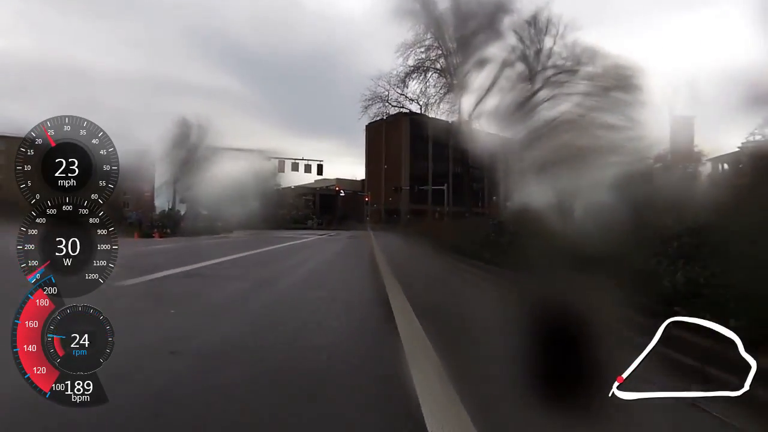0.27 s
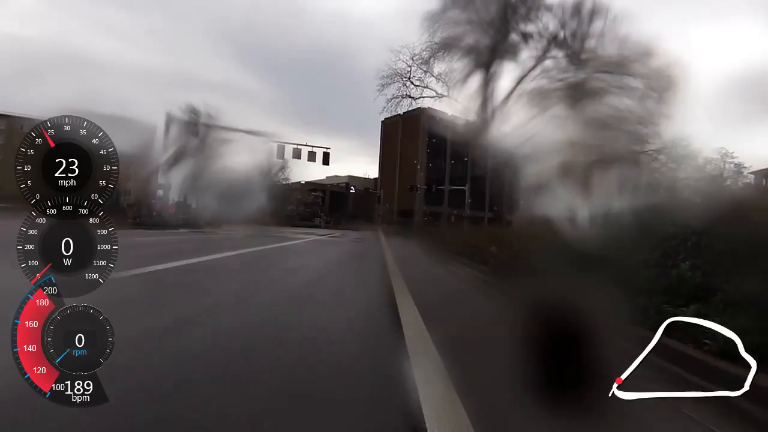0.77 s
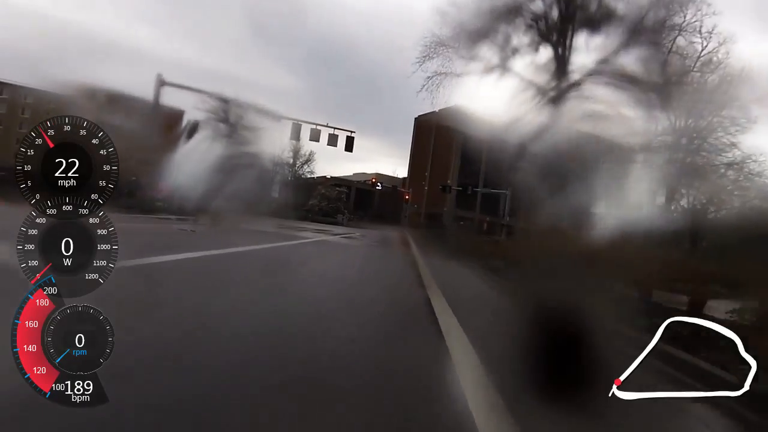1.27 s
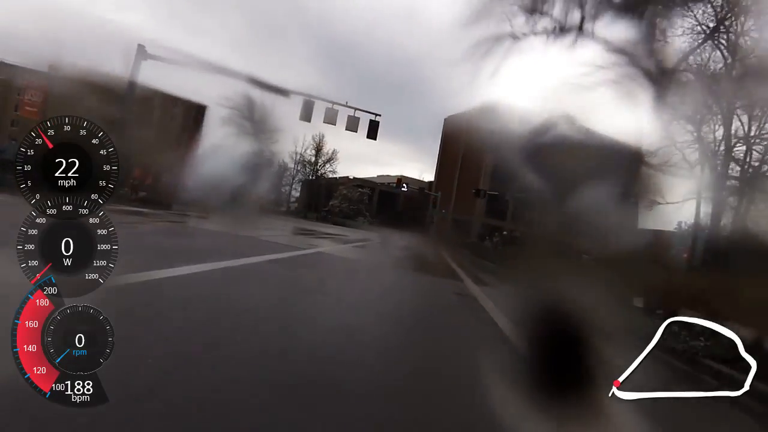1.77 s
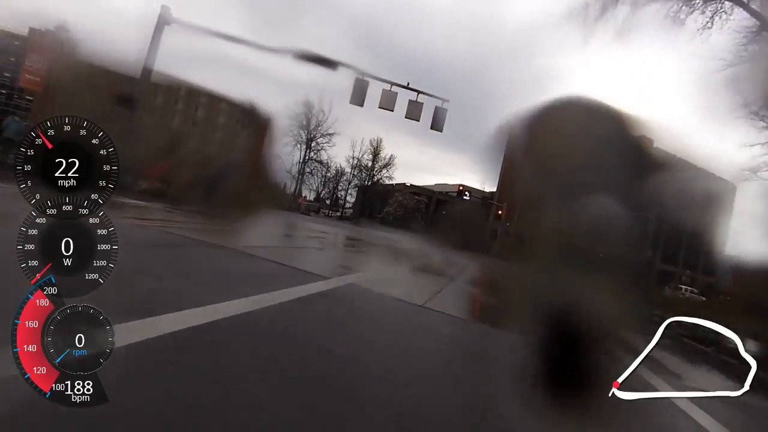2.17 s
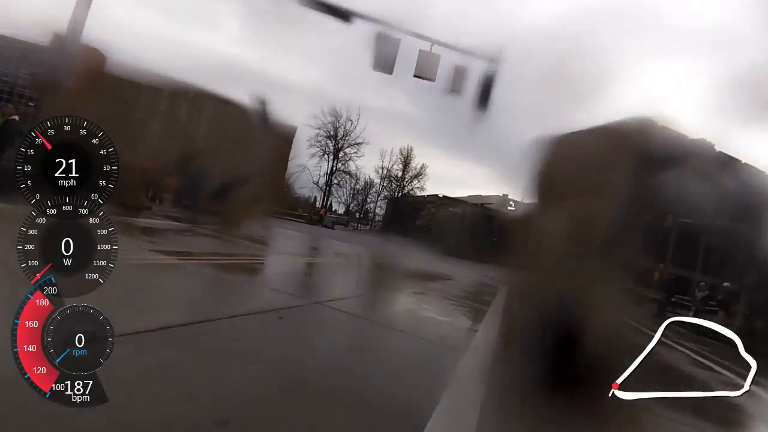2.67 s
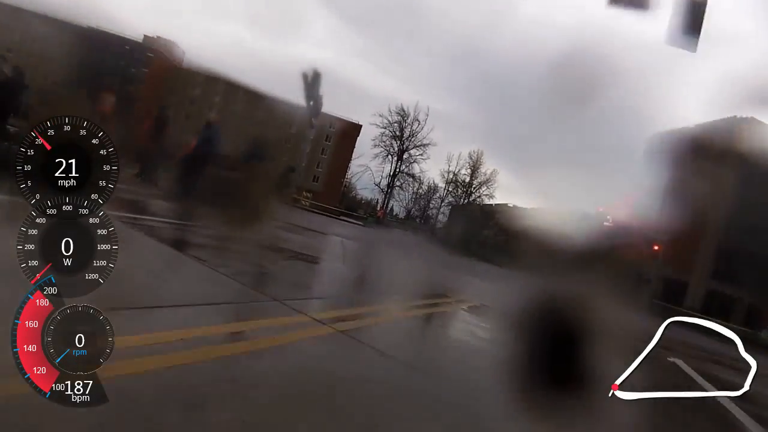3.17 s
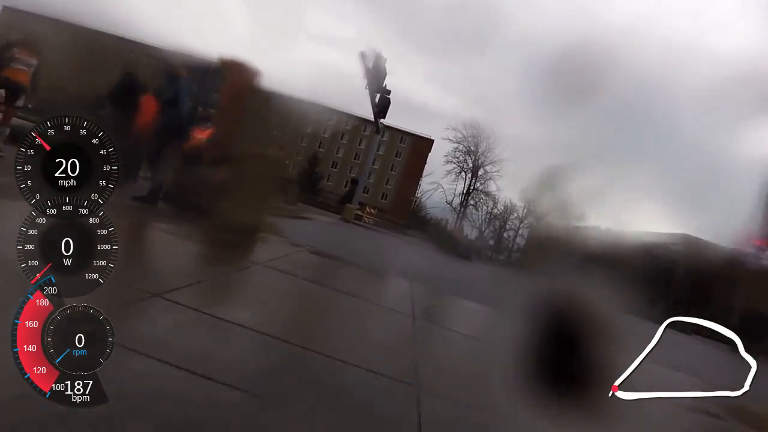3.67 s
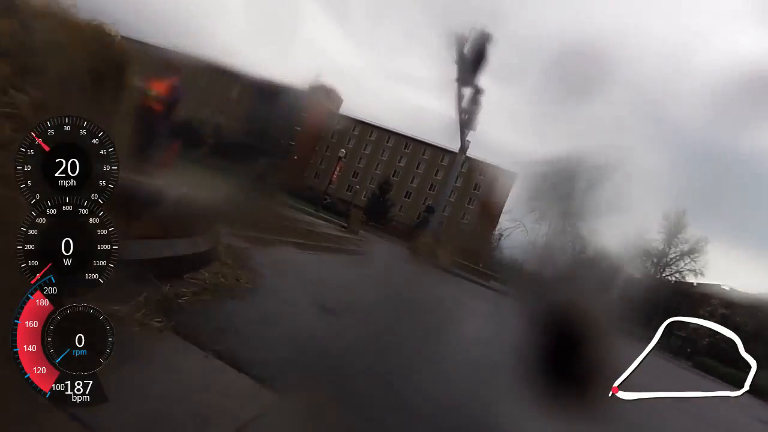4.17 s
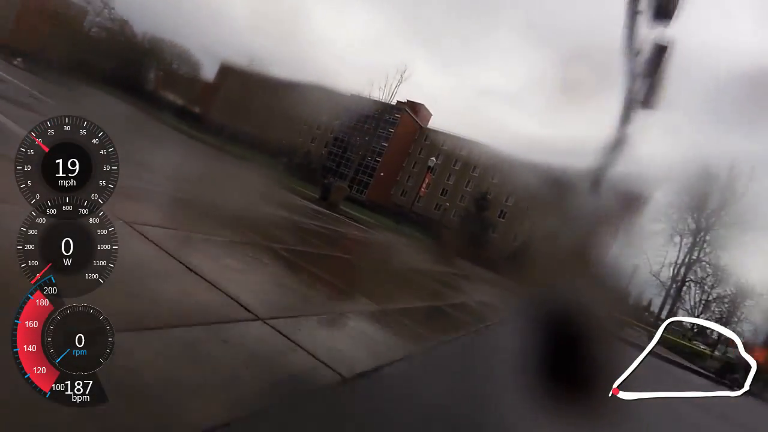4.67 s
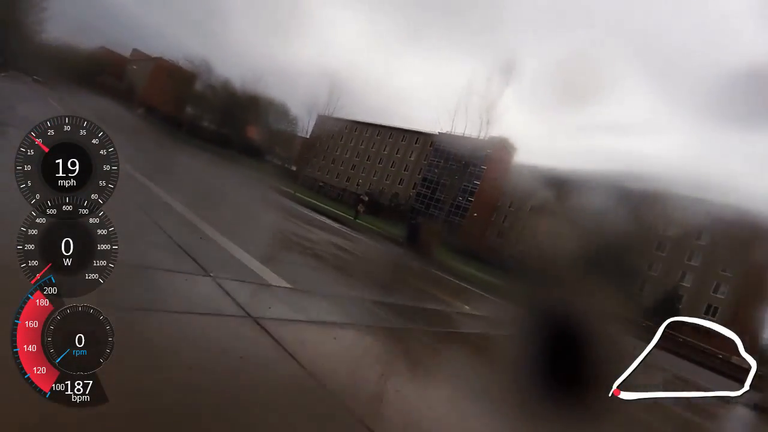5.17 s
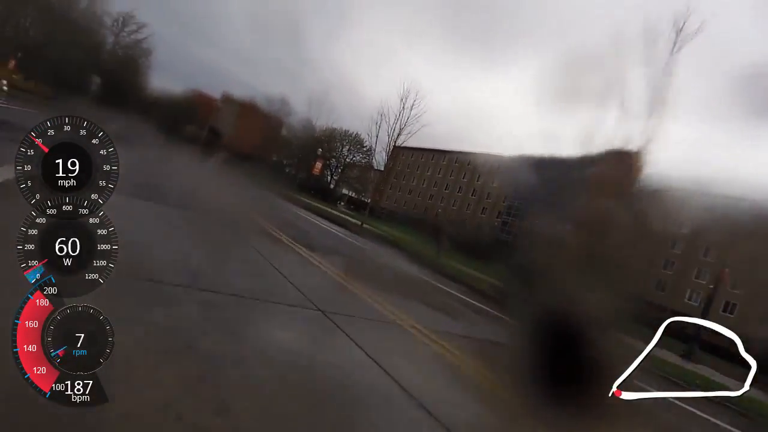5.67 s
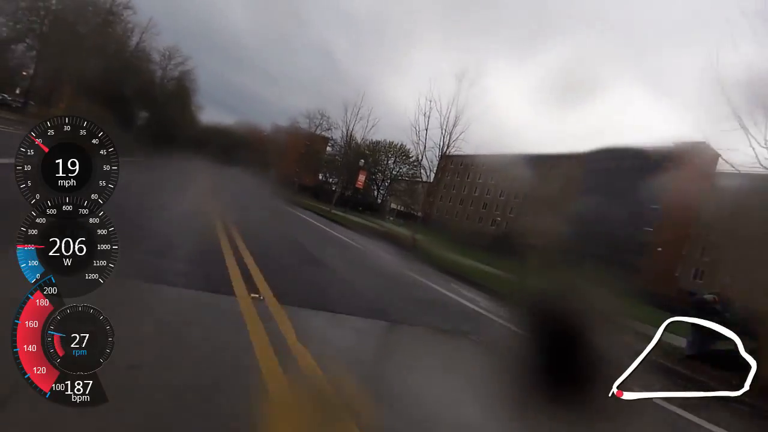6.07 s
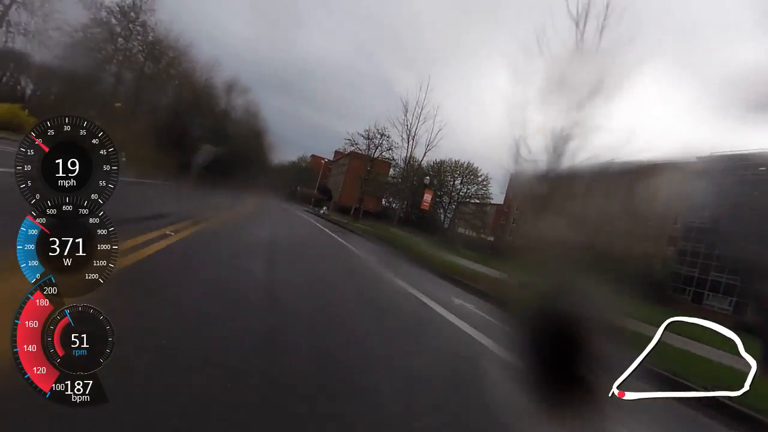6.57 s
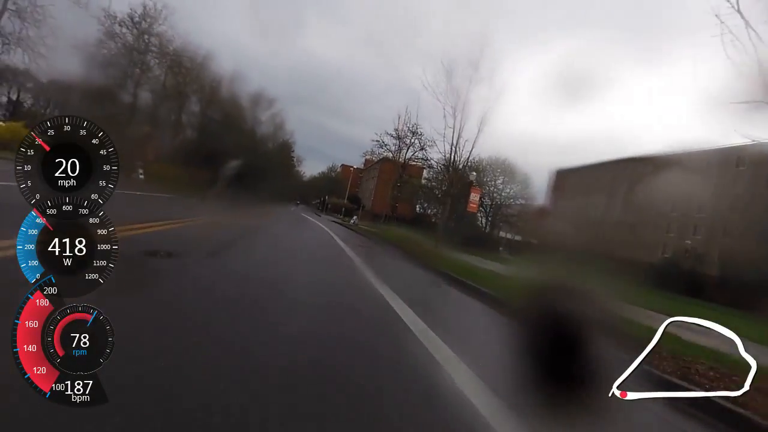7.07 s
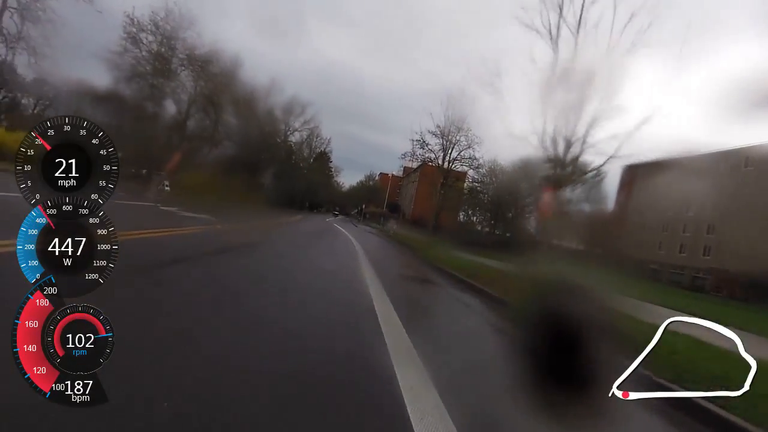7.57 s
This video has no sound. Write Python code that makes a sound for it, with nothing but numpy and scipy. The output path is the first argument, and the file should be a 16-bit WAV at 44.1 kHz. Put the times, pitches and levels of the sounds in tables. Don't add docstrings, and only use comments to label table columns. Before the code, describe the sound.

Muffled handlebar rumble of a fast bicycle on a wet road, with a gritty brake rub, then heavy jolts, rattles and gear clacks.

```python
import sys
import numpy as np
from scipy import signal
from scipy.fft import rfft, irfft, next_fast_len
from scipy.io import wavfile
from scipy.ndimage import uniform_filter1d

SR = 44100
rng = np.random.default_rng(int(sys.argv[2]) if len(sys.argv) > 2 else 0)


def pcm_store(signal):
    levels = np.round(np.clip(np.atleast_2d(signal), -1, 1) * 32767)
    wavfile.write(sys.argv[1], SR, levels.astype(np.int16).T)


def gain_from_decibels(decibels):
    exponent = np.asarray(decibels, float) / 20
    return 10 ** exponent


N = 345303


def unit_power(x):
    return x / np.sqrt(np.mean(x ** 2) + 1e-20)


def drift(rate):
    r = np.exp(-80 * np.pi * rate / SR)
    chance = rng.standard_normal(N // 40 + 2002)
    slow = signal.lfilter([1], [1, -2 * r, r * r], chance)[2000:]
    return np.interp(np.arange(N) / 40, np.arange(len(slow)), unit_power(slow))


def coloured(x, spectrum, low_hz=1, high_hz=1e6):
    size = next_fast_len(N)
    hz = np.maximum(np.arange(size // 2 + 1) * SR / size, 1)
    points_hz, points_db = np.transpose(spectrum)
    window = np.sqrt(1 / (1 + (low_hz / hz) ** 12) / (1 + (hz / high_hz) ** 12))
    gain = gain_from_decibels(np.interp(np.log(hz), np.log(points_hz), points_db))
    return irfft(rfft(x, size) * window * gain, size)[:N]


def add(out, s, piece):
    i = max(round(s * SR), 0)
    out[i:i + len(piece)] += piece[:N - i]


def add_swing(out, s, t, level, hz, spread_s, turn=0):
    add(out, s + t[0], level * np.exp(-(t / spread_s) ** 2) * np.cos(2 * np.pi * (hz * t + turn)))


# pitch in Hz, width in Hz, height in dB.
CASE_MODES = [(113, 15, 5.5), (164.4, 14, 8), (276, 150, 8), (405, 5.4, 4), (526.6, 28, 10.5),
              (639, 55, 2.5), (853, 29, -6), (959, 71, 8), (1090, 37, -0.5), (1175, 140, 8), (1342, 210, 5),
              (1507, 57, -11), (1636, 110, 12.5), (2400, 510, 5.5), (2850, 220, 7), (2920, 140, -1),
              (3855, 360, 5)]


def case(x):
    rows = []
    for hz, width, db in CASE_MODES:
        w, g = 2 * np.pi * hz / SR, gain_from_decibels(db / 2)
        a = np.pi * width / SR
        middle = -2 * np.cos(w)
        row = np.array([1 + a * g, middle, 1 - a * g, 1 + a / g, middle, 1 - a / g])
        rows.append(row / (1 + a / g))
    return signal.sosfilt(rows, x)


# time in seconds, shaking in dB, water on the asphalt in dB,
# weight on the front wheel in dB.
RIDE = [(0.0, -13, -47, -2), (0.54, -13.5, -49.5, -9), (0.98, -16, -42, -10), (1.53, -13, -46, -7),
        (1.79, -9.5, -53.5, -6.5), (2.18, -10, -46.5, -13.5), (2.44, -16.5, -45.5, -2.5),
        (2.79, -17, -45.5, -6), (2.99, -22.5, -46, -7), (3.62, -16, -41, -6.5), (4.88, -12, -45.5, -6),
        (5.19, -21, -46, 2), (5.98, -13, -43.5, -16.5), (6.39, -19.5, -51, 4), (6.76, -7.5, -53, -14),
        (6.85, -20, -50, -29), (6.91, -13.5, -52, 0), (7.83, -12.5, -50, -12.5)]
# middle in seconds, half length in seconds, change in dB.
PUDDLES = [(0.087, 0.034, -2), (0.853, 0.022, 8), (1.724, 0.088, 5.5), (2.635, 0.17, -6.5),
           (2.848, 0.031, 7.5), (3.096, 0.064, 9.5), (3.268, 0.033, -8.5), (3.455, 0.16, 1.5),
           (3.719, 0.029, -7), (3.88, 0.1, 0.5), (4.748, 0.084, 2), (5.388, 0.071, -1),
           (5.792, 0.062, -5.5), (6.2, 0.028, -6), (6.54, 0.13, 12)]
MEAN_SHAKE_DB, MEAN_WATER_DB = -17, -46


def ride():
    t = np.arange(N) / SR
    s, *columns = np.transpose(RIDE)
    shake_db, water_db, front_db = [np.interp(t, s, c) for c in columns]
    splash_db = sum(db * np.exp(-((t - s) / np.clip(half, .02, .2)) ** 2) for s, half, db in PUDDLES)
    return shake_db - MEAN_SHAKE_DB, water_db - MEAN_WATER_DB + splash_db, front_db


ZONE_EDGES_HZ = [85, 190, 370, 800, 1850]
# mean level in dB, then how much of the shaking, water and front weight it follows.
ZONES = [
    (-20.5, 0.56, 0.01, 0.78),
    (-21, 0.52, 0.01, 0.01),
    (-22.5, 0.22, 0.01, 0.01),
    (-31.5, 0.18, 0.41, 0.01),
    (-46, 0.01, 0.72, 0.01),
]
# shared with the others in dB, its own in dB, fast in dB.
FLICKER = [
    (-0.3, 0.2, 5),
    (0.32, 1.7, 0.06),
    (0.6, 0.36, 1.3),
    (0.82, 0.5, 0.5),
    (0.5, 1.5, 1.5),
]
JOLT_DB = [1.3, 3.9, 20, 15, 12]
EVENNESS = [.4, .6, 0, 0, 0]
# pitch in Hz, level in dB per Hz.
WALL = [(20, -57.5), (40, -27.5), (90, -17), (110, -4), (250, -15), (450, -15), (850, -24.5), (1350, -32),
        (1900, -43), (3900, -46), (4500, -63), (5600, -74.5), (7000, -108), (12000, -105)]
EVEN_OVER_S = .02
FRAME_HZ, FRAME_Q, FRAME_LIFT = 277, 9, .9


def road(jolt, swings):
    edges = [*ZONE_EDGES_HZ, 1e6]
    together = 0.94 * drift(8.7) + 1.4 * drift(13)
    out = 0
    for k, ((mean_db, *shares), (shared, own, fast)) in enumerate(zip(ZONES, FLICKER)):
        low_hz, high_hz = edges[k], edges[k + 1]
        jolt_db = JOLT_DB[k] * jolt
        grain_db = fast * drift(110) + jolt_db * (EVENNESS[k] == 0)
        grain = rng.standard_normal(N) * gain_from_decibels(grain_db)
        hum = unit_power(case(coloured(grain, WALL, low_hz, high_hz)))
        if low_hz < FRAME_HZ < high_hz:
            mode = signal.lfilter(*signal.iirpeak(FRAME_HZ, FRAME_Q, fs=SR), hum)
            hum = unit_power(hum + FRAME_LIFT * mode)
        if EVENNESS[k]:
            span = int(EVEN_OVER_S * SR)
            power = uniform_filter1d(uniform_filter1d(hum ** 2, size=span), size=span)
            hum = unit_power(hum / (power + .05) ** (EVENNESS[k] / 2)) * gain_from_decibels(jolt_db)
        level_db = mean_db + np.dot(shares, swings) + shared * together + own * drift(4.4)
        out = out + gain_from_decibels(level_db) * hum
    return out


# peak time in seconds, peak level in dB, pitch in Hz.
FRAME_BUMPS = [(0.4, -13.5, 258.6), (0.442, -11, 276), (0.662, -8.5, 287), (1.373, -8, 272),
               (1.823, -7.5, 259.7), (2.517, -6.5, 281), (2.706, -8, 228.6), (2.845, -8, 276),
               (3.002, -11, 513), (3.1, -7, 257.6), (3.259, -9, 281.5), (3.414, -8, 282), (3.81, -4, 289),
               (4.636, -14, 317), (5.286, -12, 346.6), (6.031, -9.5, 256), (6.073, -5, 315),
               (6.166, -7.5, 286.4), (6.729, -10, 301.5), (6.946, -7.5, 237.3), (7.3, -9, 254.4)]
# peak time in seconds, peak level in dB, pitch in Hz.
FORK_BUMPS = [(2.937, -9, 139.7), (3.147, -4.5, 109.4), (3.358, -8.5, 147.4), (3.548, -4, 113),
              (3.667, -5, 127), (4.124, -9, 151), (4.299, -7, 139), (4.367, -18, 85.4), (5.005, -5, 113.4),
              (5.095, -13, 129.2), (5.113, -9, 103.2), (5.221, -2, 135.8), (5.443, -3.5, 133.3),
              (5.484, -3.5, 131.3), (5.564, -5, 155), (5.679, -6.5, 190), (5.713, -5, 155.2),
              (5.794, -7, 137.3), (6.388, -7.5, 114), (6.551, -7, 107.3), (6.64, -6.5, 137)]
# peak time in seconds, peak level in dB, pitch in Hz.
FRAME_HUMS = [
    (1.075, -9, 285.6),
    (1.106, -11, 279),
    (2.1, -12.5, 271.3),
    (6.664, -8, 249),
    (6.707, -10.5, 238),
    (6.756, -14.5, 280),
]
FRAME_SWING_MS, FORK_SWING_MS, HUM_MS = 12.7, 12, 28


def bumps():
    out, t = np.zeros(N), np.arange(-SR // 16, SR // 16) / SR
    rows = [(*r, FRAME_SWING_MS) for r in FRAME_BUMPS]
    rows += [(*r, FORK_SWING_MS) for r in FORK_BUMPS]
    rows += [(*r, HUM_MS) for r in FRAME_HUMS]
    turns = rng.normal(0, 0.12, len(rows))
    for (s, db, hz, ms), turn in zip(rows, turns):
        spread_s = np.clip(ms, 3, 40) / 1000 * np.where(t < 0, .5, .75)
        add_swing(out, s, t, gain_from_decibels(db), hz, spread_s, turn)
    return out


# time in seconds, peak level in dB, pitch in Hz.
STONES = [(0.073, -7, 293.4), (0.198, -9, 269), (0.282, -14.5, 252), (0.747, -6, 278), (0.95, -7, 299),
          (0.999, -11.5, 299.6), (1.121, -11, 289), (1.179, -12.5, 271), (1.221, -6.5, 271.3),
          (1.447, -11, 282), (1.64, -7.5, 264.7), (1.685, -9, 272.5), (2.377, -2.5, 260.6),
          (2.557, -4, 257), (3.201, -9.5, 275), (3.351, -7, 273), (3.507, -5.5, 259), (3.701, -13.5, 304),
          (4.059, -9.5, 282), (4.106, -8.5, 274), (4.279, -3, 262.4), (4.591, -11.5, 343), (4.843, -5, 293),
          (4.922, -4.5, 241), (5.034, -14, 294.6), (5.208, -11, 276.3), (5.481, -4, 311.5),
          (5.559, -8.5, 277), (5.593, -15.5, 298), (5.676, -3, 259), (5.789, -8, 276.3), (5.888, -6, 283),
          (6.064, 0, 338.5), (6.538, -5.5, 244), (7.022, -9.5, 244.4), (7.237, -12, 231.5),
          (7.554, -15, 276), (7.758, -25.5, 287)]
# time in seconds, peak level in dB, pitch in Hz.
DIPS = [(0.251, -11.5, 177.7), (0.381, -17.5, 174.4), (0.624, -11, 171.3), (0.676, -11.5, 171.3),
        (1.185, -23.5, 152), (1.583, -10.5, 149), (1.638, -14.5, 190.3), (1.788, -15.5, 119.2),
        (2.297, -17.5, 116.8), (2.37, -11.5, 128.8), (3.246, -11, 150), (3.886, -10.5, 128),
        (3.941, -14, 102), (3.988, -12.5, 109), (4.438, -9.5, 168.7), (4.597, -14.5, 125.6),
        (5.364, -15, 109), (6.046, -6.5, 119.7), (6.146, -14, 134.8), (6.267, -13, 103.7),
        (6.747, -17.5, 123.2), (6.913, -13.5, 175), (7.303, -10, 113.3)]
# time in seconds, peak level in dB, pitch in Hz.
NUDGES = [(0.939, -11.5, 531), (1.368, -16, 543), (1.643, -12.5, 546), (1.965, -11, 542), (2.211, -14, 508),
          (2.58, -18, 521), (2.683, -9, 508), (3.247, -13.5, 521), (3.35, -4.5, 513), (3.539, -8, 498),
          (3.905, -4, 522), (5.193, -10.5, 403), (5.553, -7.5, 595), (5.674, -10.5, 507), (5.994, -9, 546),
          (6.18, -12.5, 499), (6.225, -12.5, 570), (6.47, -12, 439), (6.678, -7.5, 544),
          (6.943, -13.5, 528), (7.11, -18.5, 409), (7.235, -9, 495), (7.497, -11, 519)]
# time in seconds, peak level in dB, pitch in Hz.
RIPPLES = [(0.04, -6, 278), (0.147, -5, 305), (0.282, -7.5, 265), (0.351, -14.5, 279.6), (0.494, -8, 245),
           (0.577, -7, 297), (0.846, -6.5, 282.5), (1.303, -8, 283.3), (1.542, -6.5, 275),
           (1.599, -14, 264.3), (1.841, -11.5, 251), (1.905, -16.5, 261.7), (2.125, -9.5, 272),
           (2.239, -9, 269), (2.419, -8, 300), (2.477, -9.5, 260), (2.613, -10.5, 272), (2.665, -9, 233),
           (6.784, -7.5, 353.5), (6.895, -14, 296.6), (7.078, -14.5, 223.3), (7.339, -6, 238.6),
           (7.387, -21.5, 269), (7.493, -19.5, 287), (7.622, -7, 345), (7.674, -6.5, 271),
           (7.787, -13, 274)]
# time in seconds, peak level in dB, pitch in Hz.
SWAYS = [(0.047, -25, 128.6), (0.329, -25, 100.8), (0.449, -24.5, 106), (0.848, -27.5, 126.2),
         (0.999, -25, 137), (1.443, -15.5, 119.5), (1.997, -19, 121.3), (2.149, -27, 113),
         (3.299, -31.5, 96.3), (5.621, -21, 125), (6.32, -12.5, 108), (7.452, -28, 122.2)]
# swell in seconds, swing length in ms, change of peak level in dB.
SOFT_BLOWS = [
    (0.00821, 16, -4),
    (.011, 23, -3.5),
    (0.0054, 11, -7),
    (.012, 24, -6),
    (.02, 52, -9),
]


def soft_blows():
    out, t = np.zeros(N), np.arange(-SR // 16, SR // 16) / SR
    for rows, (swell_s, ms, under_db) in zip([STONES, DIPS, NUDGES, RIPPLES, SWAYS], SOFT_BLOWS):
        spread_s = np.clip(ms, 3, 45) / 1000 * np.where(t < 0, .4, .8)
        for s, db, hz in rows:
            add_swing(out, s + swell_s, t, gain_from_decibels(db + under_db), hz, spread_s)
    return out


# start in seconds, level in dB, pitch in Hz.
KNOCKS = [(4.364, -2, 660), (4.411, -7, 560), (4.455, -1, 710), (4.493, -4.5, 627), (4.542, -3.5, 523),
          (4.992, -6, 596), (5.01, -10.5, 670), (5.0352, -3.5, 640), (5.157, -5, 540), (5.706, -20, 456),
          (5.708, 1.5, 940), (5.73, -3.5, 557), (5.9493, -8, 940), (5.9509, -12, 443), (5.953, -5, 460),
          (6.031, -12, 503), (0.257, -26, 517), (1.936, -24, 530), (2.924, -27, 520), (6.939, -20, 555),
          (6.292, -17, 553), (6.343, -15, 710), (6.419, -19.5, 750), (7.06, -12, 505), (7.766, -19, 530),
          (6.548, -1, 506), (6.638, -11.5, 400)]
# start in seconds, level in dB, pitch in Hz, ring-down in seconds.
SLAMS = [(5.2727, -9, 560, .05), (5.2766, 3, 590, .14), (5.2862, 0, 580, .06), (5.2966, -8, 545, .18),
         (5.3265, -10, 530, .06), (6.0573, 2.5, 780, .07), (6.0625, 1, 420, .05), (6.0702, 2.5, 480, .022),
         (6.0765, -9, 430, .06), (6.082, -8, 650, .05), (6.0975, -7, 640, .07)]
# times the knock pitch, level in dB, share of the ring-down.
HOLLOW = [
    (1, 0, 0.9),
    (1.3, -3.5, 0.5),
    (1.7, -7, 0.4),
    (2.35, -10, 0.35),
    (0.76, -12.5, .8),
]
KNOCK_T60_S = 0.034
SLAM_GRIP_S, SLAM_OVERTONE_DB, CHOKE_S = .0008, -5, .0007
PUNCH_DB, PUNCH_MS = 5, 2
CONTACT_LAG_S = .0012


def knocks():
    out, t = np.zeros(N), np.arange(SR // 4) / SR
    rows = [(*r, KNOCK_T60_S, False) for r in KNOCKS] + [(*r, True) for r in SLAMS]
    uneven = rng.normal(0, 1, (len(rows), len(HOLLOW)))
    for (s, db, hz, t60, heavy), chance in zip(rows, uneven):
        if heavy:
            until = min([r[0] - s for r in SLAMS if r[0] > s] + [1])
            choke = np.exp(-np.maximum(t - until + CONTACT_LAG_S, 0) / CHOKE_S)
            grip = (1 - np.exp(-t / SLAM_GRIP_S)) * choke
        else:
            punch = gain_from_decibels(PUNCH_DB) * np.exp(-t * 1000 / PUNCH_MS)
            grip = (1 - np.exp(-t / 0.00036)) * (0.68 + punch) / 2
        for (times, mode_db, share), c in zip(HOLLOW, chance):
            mode_db = mode_db + heavy * (times > 1) * SLAM_OVERTONE_DB
            decay_db = 60 * t / np.clip(t60 * share, .004, .2)
            mode_hz = hz * times * (1 + 0.037 * c * (times != 1))
            level = gain_from_decibels(db + mode_db + 3.5 + c - decay_db)
            add(out, s + CONTACT_LAG_S, -grip * level * np.sin(2 * np.pi * mode_hz * t))
    return signal.sosfilt(signal.butter(4, 2200, fs=SR, output="sos"), out + 1e-18)


# start in seconds, level in dB, share above the wall's cut in dB, pitch in Hz.
RATTLES = [(3.808, -38, -2, 3600), (3.9444, -18, -37, 3200), (5.479, -32, -10.5, 3500),
           (6.642, -33, -14, 3600), (6.941, -37, -14, 3400), (4.3637, -7, -32, 3700),
           (4.4124, -18, -38, 1960), (4.4516, -10, -17, 3200), (4.4928, -12.5, -16, 2070),
           (4.54, -20.5, -18, 3020), (4.9917, -18.5, -43.5, 1960), (5.035, -9, -26, 3300),
           (5.103, -24.5, -19, 3480), (5.108, -19, -36, 3395), (5.1546, -14, -37.5, 1700),
           (5.2783, -18, -27, 2500), (5.283, -34, -24, 1700), (5.286, -41, -18, 1700),
           (6.0625, -14, -21, 2700), (5.288, -22, -8, 1986), (5.5967, -25, -24, 3510),
           (5.671, -18, -30, 3800), (5.7288, -7, -32, 3540), (6.0601, -28.5, -38, 1740),
           (6.0705, -18, -7, 1750), (6.097, -22.5, -32, 3500), (6.1596, -24, -35, 2400),
           (6.17, -16, -35, 2490), (6.1777, -22, -42, 2420), (6.5315, -21, -26, 2060),
           (6.536, -21, -28, 2690), (6.5483, -8.5, -38, 3110), (6.6375, -21.5, -27, 2450)]
# start in seconds,
# level in dB, pitch in Hz.
TICKS = [(4.549, -33, 3400), (5.6795, -36, 3500), (5.698, -33, 3500), (5.719, -34, 3500), (6.05, -34, 3020),
         (0.724, -29.5, 3600), (1.711, -33, 3330), (1.726, -34, 2820), (3.625, -27.5, 3380),
         (4.053, -25.5, 2730), (4.0907, -24.5, 2270), (4.3536, -29, 4400), (4.3657, -16.5, 2060),
         (4.4392, -21, 2830), (4.463, -28, 3200), (4.487, -29, 3240), (4.5044, -36, 3800),
         (4.986, -23.5, 3570), (5.013, -23, 2290), (5.13, -29.5, 2840), (5.464, -28, 3500),
         (5.471, -34, 3690), (5.478, -33, 2500), (5.633, -35, 2320), (5.681, -29, 3400), (6.026, -30, 2920),
         (6.035, -25, 2290), (6.1283, -32, 3800), (6.1449, -35, 2430), (6.246, -29.5, 3200),
         (6.301, -26, 2850), (6.331, -30, 3300), (6.043, -35, 3800), (6.084, -34, 3600), (5.294, -34, 3020),
         (6.3736, -32, 3300), (6.5244, -30, 3300), (6.5915, -36, 3400)]
# start in seconds, level in dB, share above the wall's cut in dB, pitch in Hz, length in ms.
GEAR_CHANGE = [
    (5.686, -23.5, -29, 2600, 5.2),
    (5.7022, -30, -5.5, 3500, 2.1),
    (5.7035, -3.5, -35, 2150, 5.7),
    (5.9463, -0.5, -12.5, 1880, 1.6),
    (6.047, -32, -26, 2500, 4),
]
RATTLE_MS, TICK_TOP_DB = 1.8, -24.5
CRACK_BAND_HZ = (500, 3930)
CRACK_TAIL_DB, CRACK_TAIL_MS = -9.5, 7
LIGHT_DB, LIGHT_BURST, LIGHT_RING = -18.5, .55, 2.2


def cracks():
    body, top, t = np.zeros(N), np.zeros(N), np.arange(1400) / SR
    rows = [(*r, RATTLE_MS) for r in RATTLES]
    rows += [(s, db, TICK_TOP_DB, hz, RATTLE_MS) for s, db, hz in TICKS]
    rows += list(GEAR_CHANGE)
    rattle = rng.standard_normal((len(rows), len(t)))
    for (s, db, top_db, hz, ms), noise in zip(rows, rattle):
        x = t * 1000 / np.clip(ms, .3, 5)
        fade = np.exp(-x ** 2)
        burst = noise * np.minimum(6 * x, 1) * fade
        buzz = gain_from_decibels(CRACK_TAIL_DB) * np.exp(-t * 1000 / CRACK_TAIL_MS)
        tail = noise * np.minimum(x, 1) * buzz
        ringing = signal.lfilter(*signal.iirpeak(hz, 2.5, fs=SR), burst)
        if db < LIGHT_DB:
            contact = LIGHT_BURST * burst + LIGHT_RING * ringing + .5 * tail
        else:
            contact = 1.59 * burst + 0.32 * ringing + tail
        treble = noise * np.minimum(0.93 * x, 1) * fade + 0.25 * tail
        add(body, s + CONTACT_LAG_S, gain_from_decibels(db + 0.5) * contact)
        add(top, s + CONTACT_LAG_S, gain_from_decibels(db + top_db + 5.5) * treble)
    body = signal.sosfilt(signal.butter(2, CRACK_BAND_HZ[0], "high", fs=SR, output="sos"), body + 1e-18)
    body = signal.sosfilt(signal.butter(12, CRACK_BAND_HZ[1], fs=SR, output="sos"), body)
    top = signal.sosfilt(signal.butter(2, [4400, 6800], "band", fs=SR, output="sos"), top + 1e-18)
    soft_top = signal.sosfilt(signal.butter(2, 8000, fs=SR, output="sos"), top)
    return body + soft_top + gain_from_decibels(-13.5) * np.gradient(top)


# pitch in Hz, level in dB per Hz.
BRAKE_COLOUR = [(1700, -25.5), (2300, 8.5), (4000, 1.5), (5500, -1.5), (6200, -10), (6900, -28.5),
                (8800, -41), (12000, -53)]
BRAKE_JUDDER_HZ, BRAKE_JUDDER_DB = 28.2, 2.5
SQUEEZE_S, SQUEEZE_LENGTH_S, SQUEEZE_DB = .715, .89, -64
BITE_S, LET_GO_S, PAD_FADE_DB_PER_S = .025, .09, 7
PAD_DRAG_DB, DRAG_PER_WATER = -72, 1.1


def brake(water_db):
    t = np.arange(N) / SR - SQUEEZE_S
    squeeze = np.clip(np.minimum(t / BITE_S, 1 + (SQUEEZE_LENGTH_S - t) / LET_GO_S), 0, 1)
    grip = squeeze * gain_from_decibels(SQUEEZE_DB - PAD_FADE_DB_PER_S * t)
    judder_hz = BRAKE_JUDDER_HZ * (1 + 0.055 * drift(5.7))
    judder = np.sin(2 * np.pi * np.cumsum(judder_hz) / SR)
    grit = rng.standard_normal(N) * gain_from_decibels(BRAKE_JUDDER_DB * judder + 2.5 * drift(90))
    level = grip + gain_from_decibels(PAD_DRAG_DB + DRAG_PER_WATER * water_db)
    return level * gain_from_decibels(13.0) * unit_power(case(coloured(grit, BRAKE_COLOUR)))


# peak time in seconds, peak level in dB.
GUSTS = [(1.7, -34.5), (2.51, -32), (2.88, -29), (3.12, -31), (3.3, -24), (3.53, -20), (3.7, -35),
         (3.81, -31.5), (3.95, -21.5), (4.379, -29.5), (4.99, -25), (5.12, -30.5), (5.21, -28), (5.32, -50),
         (5.47, -41.5), (5.6, -29.5), (5.69, -19.5), (6.06, -15), (6.89, -33), (7.09, -43), (7.22, -38.5),
         (7.82, -28.5)]
GUST_RISE_DB_PER_S, GUST_FALL_DB_PER_S = 168, 153
BREEZE_DB, BREEZE_PER_WATER = -35, 0.4


def wind(water_db):
    t, gusts = np.arange(0, N, 32) / SR, 0
    for s, db in GUSTS:
        below_db = np.where(t < s, GUST_RISE_DB_PER_S * (s - t), GUST_FALL_DB_PER_S * (t - s))
        gusts = gusts + gain_from_decibels(db - below_db)
    level = np.interp(np.arange(N) / SR, t, gusts) + gain_from_decibels(BREEZE_DB + BREEZE_PER_WATER * water_db)
    lumps = rng.standard_normal(N) * gain_from_decibels(0.65 * drift(13))
    return level * unit_power(coloured(lumps, WALL, 0.79, ZONE_EDGES_HZ[0]))


def scene():
    swings = ride()
    water_db = swings[1]
    thumps = bumps() + soft_blows()
    jolt = uniform_filter1d(np.abs(thumps), size=400)
    mix = road(jolt, swings) + thumps + knocks() + cracks() + brake(water_db) + wind(water_db)
    return mix[None]


def top_cut(x):
    return signal.sosfilt(signal.butter(12, 17140, fs=SR, output="sos"), x)


OVERLOAD, KNEE, INPUT_CUT_HZ = 1.1, 5, 17000
SELF_NOISE_DB = -81.5


def record(dry):
    held = dry / (1 + np.abs(dry / OVERLOAD) ** KNEE) ** (1 / KNEE)
    held = np.clip(held, -1, 1)
    hiss = gain_from_decibels(SELF_NOISE_DB) * signal.lfilter([1], [1, -.9], rng.standard_normal(N))
    hiss = signal.sosfilt(signal.butter(2, 7500, fs=SR, output="sos"), hiss) + gain_from_decibels(-10.0) * hiss
    held = signal.sosfilt(signal.butter(2, INPUT_CUT_HZ, fs=SR, output="sos"), held + hiss)
    fade_in = np.minimum(np.arange(N) / 60, 1)
    return top_cut(held * fade_in)


dry = scene()
out = record(dry)
pcm_store(out)
```